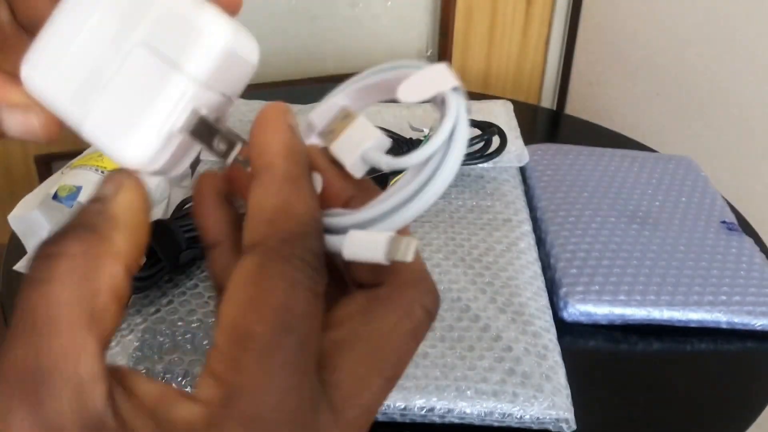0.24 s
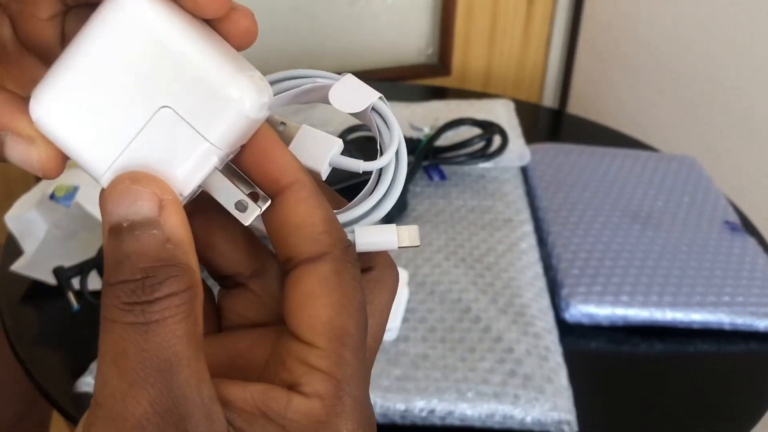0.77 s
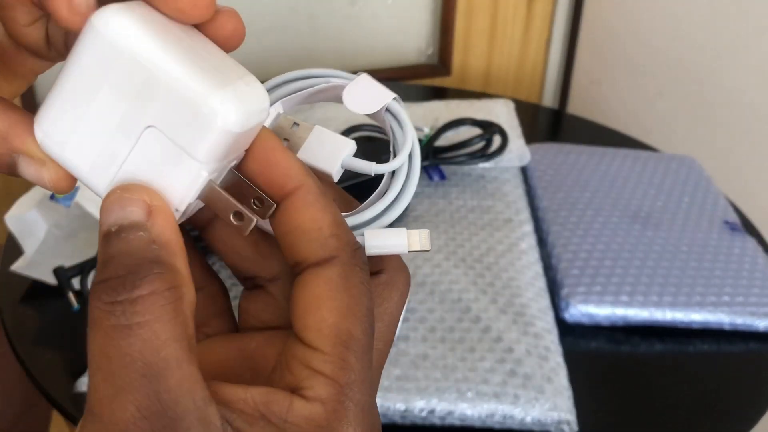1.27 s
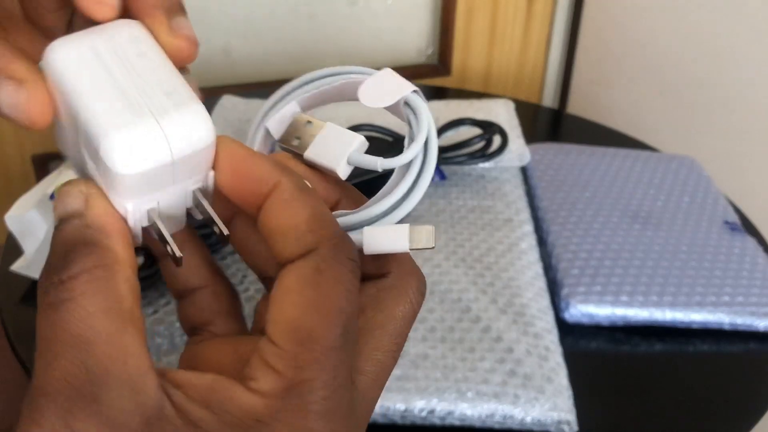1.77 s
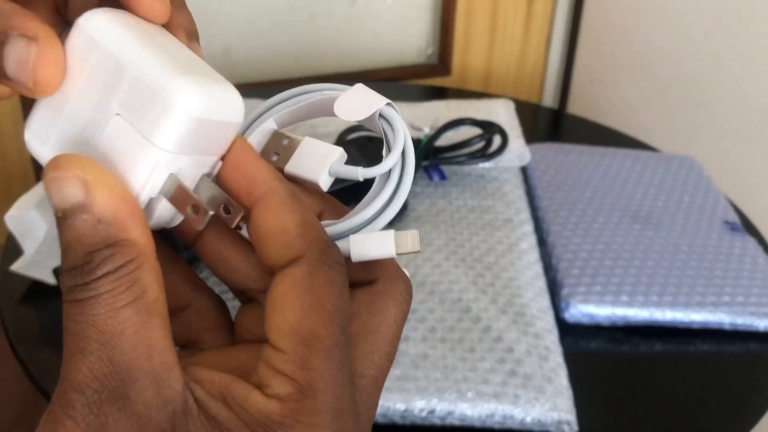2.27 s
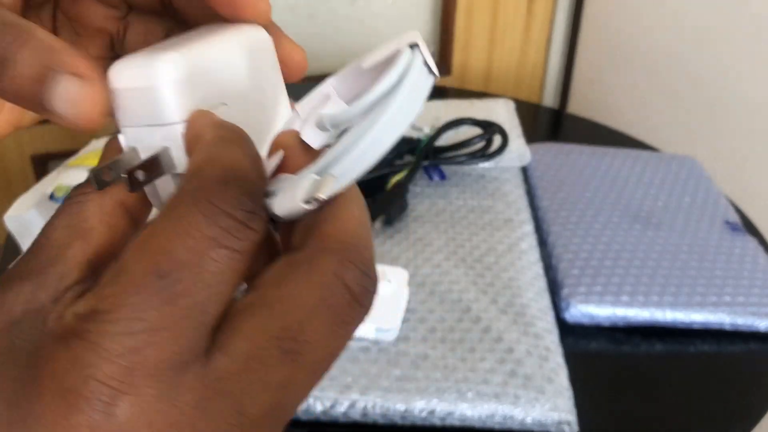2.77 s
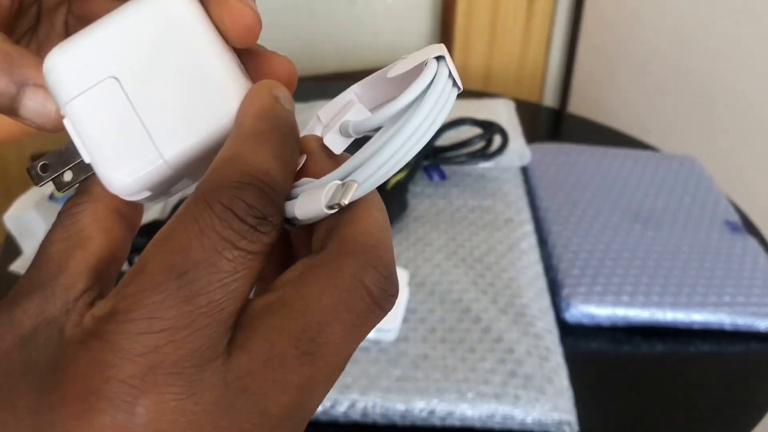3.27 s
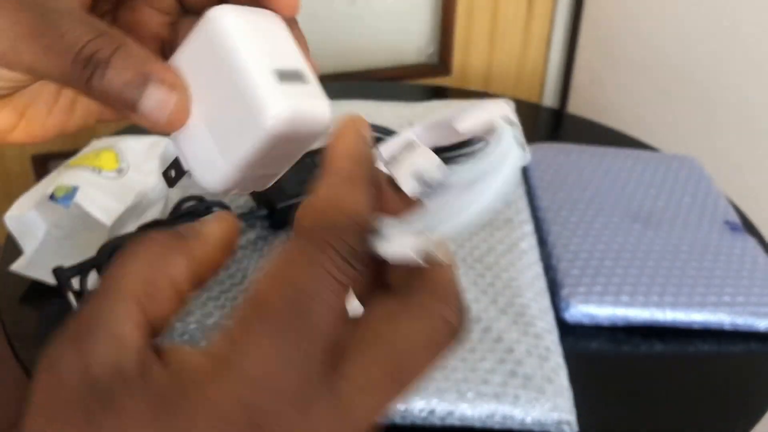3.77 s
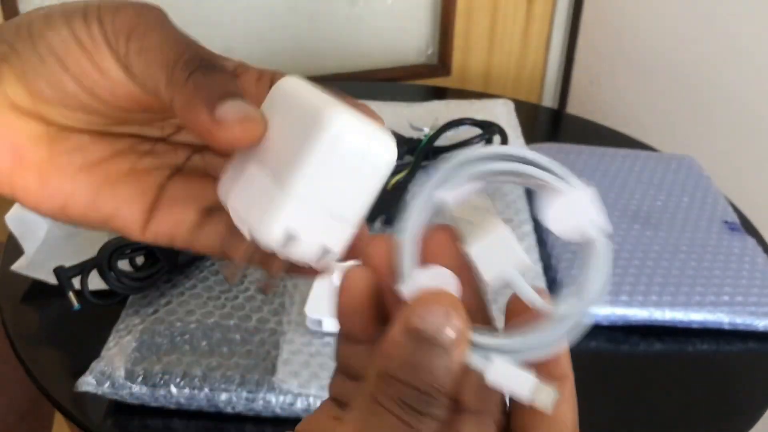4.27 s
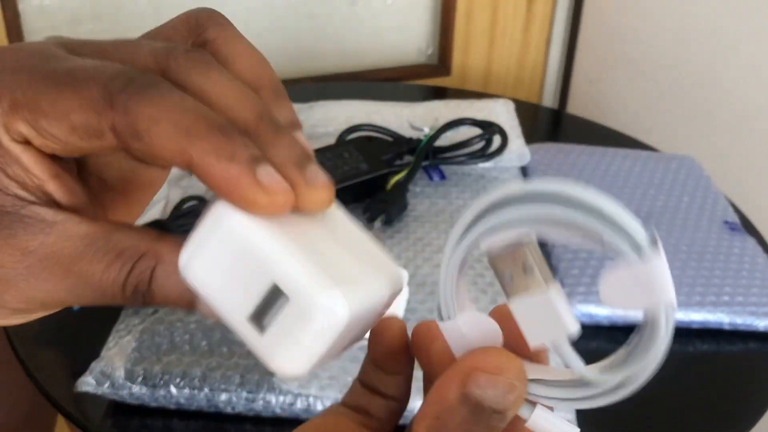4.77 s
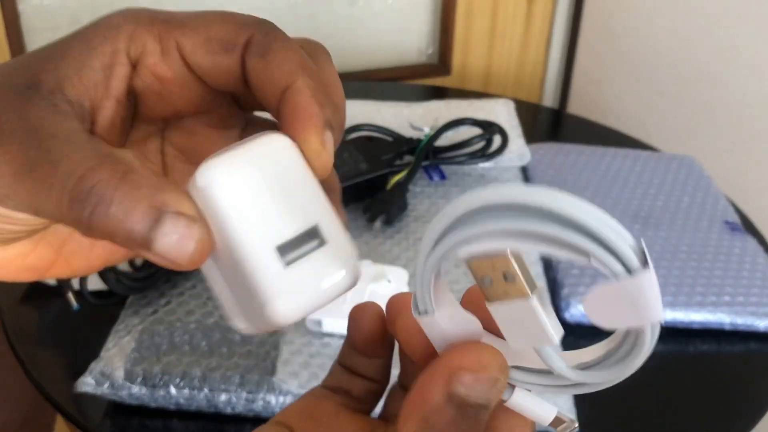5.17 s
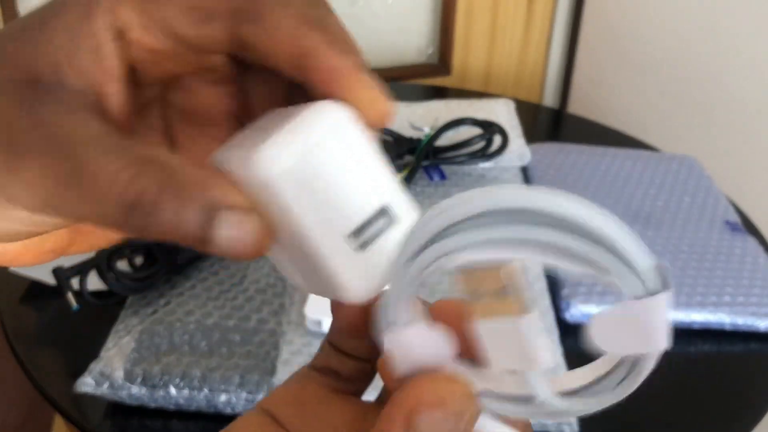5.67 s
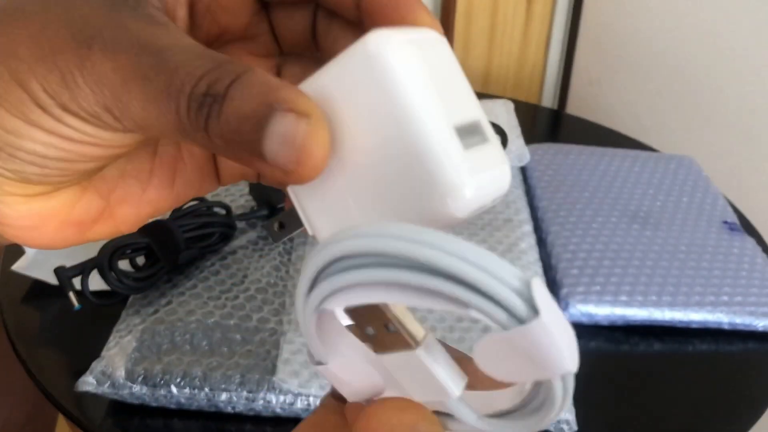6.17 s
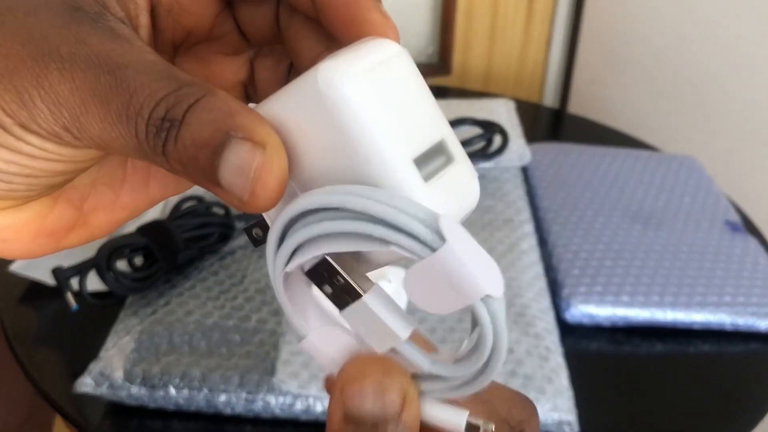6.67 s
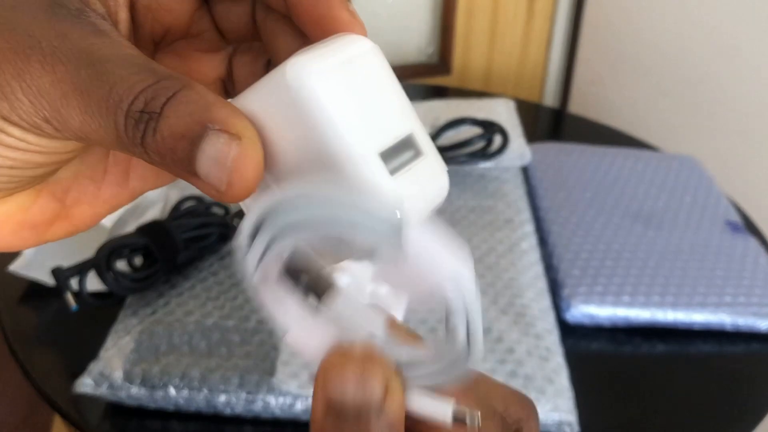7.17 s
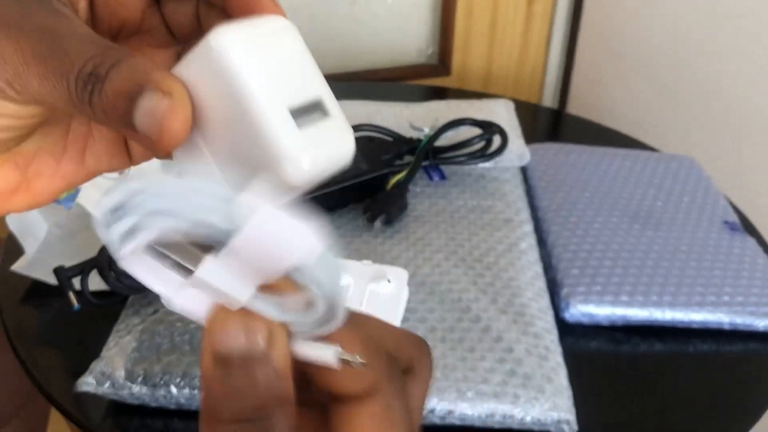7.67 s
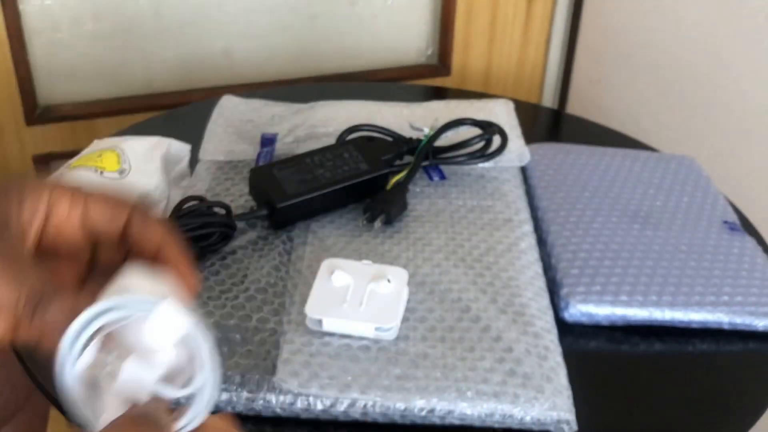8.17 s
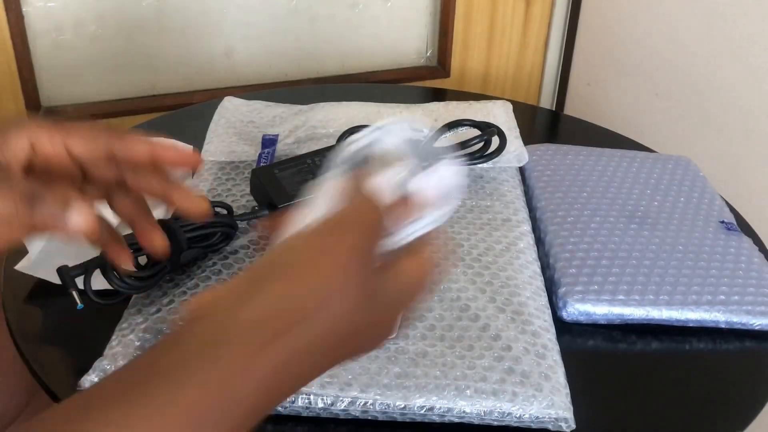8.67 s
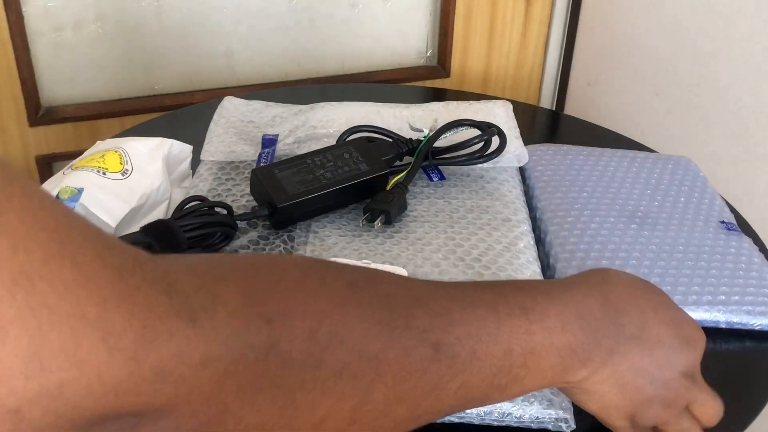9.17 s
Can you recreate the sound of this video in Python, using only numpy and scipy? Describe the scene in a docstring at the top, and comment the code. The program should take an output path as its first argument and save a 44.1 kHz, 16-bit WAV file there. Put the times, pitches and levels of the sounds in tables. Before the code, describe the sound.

A quiet indoor room holds a faint low hum, soft airy hiss and barely audible rapid camera ticking throughout. From 0 to 4 s, close fingers brush smooth plastic in tiny dry slips, with sparse faint clicks and soft padded bumps. A clearer small tick comes at 4.1 s, followed by more light rubbing until about 5.9 s. At 6.3 s a cable's plugs begin rapping the plastic shell: short, bright, rough clicks roughly every 0.2 s, some doubled, dipping around 6.8-7.0, strongest from 7.2 to 7.8, then scattering into a weaker rattle until 8.2 s. Low soft bumps and skin brushes follow, with a light click at 8.5 and a fainter one at 8.8. At 9.13 s the charger hits a wooden table with a loud cracking knock and quick bounces, then a weaker clustered knock at 9.27-9.31 s, ringing briefly in the room.

```python
"""Quiet room with a humming appliance: hands turn a plastic charger and a coiled cable close to a phone.
Fingers brush the plastic (dense noise slips of uneven size, swelling with each stroke) and bump it softly.
The shaken cable's plugs click against the charger: short rough contacts ring the shell.
The charger is then put down on a wooden table, whose modes ring with each blow.
The phone's own camera ticks faintly with every frame; hands and table also sound through the room."""
import sys
import numpy as np
from scipy import signal
from scipy.fft import rfft, irfft, next_fast_len
from scipy.io import wavfile
from scipy.ndimage import uniform_filter1d

SR = 44100
rng = np.random.default_rng(int(sys.argv[2]) if len(sys.argv) > 2 else 0)


def master_out(mix):
    """Clip the mix to full scale and print it as 16-bit PCM to the path in sys.argv[1]."""
    frames = np.transpose(np.atleast_2d(mix))
    ceiling = np.clip(frames, -1, 1)
    pcm = np.round(ceiling * 32767).astype(np.int16)
    wavfile.write(sys.argv[1], SR, pcm)


N = 415863

# room-tone spectrum before levelling: (frequency [Hz], relative density [dB])
AIR_SPECTRUM = [(18, -31), (30, -9), (55, -1), (124, -5), (184, -1.5), (287, -4.5), (415, -5), (449, -9),
                (666, -8.5), (844, -11.5), (1460, -23.5), (2400, -28.5), (2800, -31), (3150, -24.5),
                (3700, -26), (7090, -34), (16000, -53.5)]
# room resonances: (frequency [Hz], half-amplitude width [Hz], rms level [dB])
ROOM_RESONANCES = [(154, 15, -75.5), (186, 19, -78), (223.2, 21.6, -67.5), (289, 33, -70.5),
                   (339.6, 30, -71), (418, 28, -84.5), (535, 78, -71.5)]
# steady motor tones: (frequency [Hz], rms level [dB])
MOTOR_TONES = [(66.8, -68.5), (667.3, -69), (789, -75.5)]
# hands shifting all the while: (time [s], level [dB])
HAND_SHIFT = [(0.0, -81), (1.52, -82.5), (2.41, -80), (3.2, -83), (4.36, -76), (5.38, -79.5), (7.14, -83),
              (7.54, -77), (8.45, -67.5), (8.8, -81), (9.11, -69), (9.43, -74.5)]
# single finger strokes: (nominal start [s], length [s], level at the crest [dB], top octave re level [dB])
FINGER_STROKES = [(0.04, 0.026, -74, -12), (0.186, 0.024, -71.5, -5), (0.96, 0.038, -76.5, -1),
                  (1.222, 0.045, -63, -6), (1.358, 0.064, -69, -0.5), (1.654, 0.1, -68.5, -10),
                  (2.09, 0.13, -75.5, -12), (2.42, 0.053, -71, -24), (2.504, 0.046, -72, -10),
                  (2.566, 0.068, -69, -7), (2.657, 0.026, -71, -9), (2.856, 0.2, -70, -3.5),
                  (3.366, 0.16, -71, -.6), (3.673, 0.068, -72, -2), (3.791, 0.023, -72, -14),
                  (3.875, 0.034, -59.5, -5), (4.044, 0.079, -64, -4), (4.254, 0.035, -63, -10),
                  (4.394, 0.05, -60.5, -6), (4.504, 0.012, -68, -12), (4.62, 0.089, -68.5, -7),
                  (4.957, 0.14, -73, -17), (5.247, 0.011, -72, -1), (5.33, 0.036, -76, -4.5),
                  (5.427, 0.07, -74, 2), (5.583, 0.024, -65.5, -6), (5.773, 0.027, -57.5, -6),
                  (8.327, 0.057, -58, -10), (8.512, 0.036, -52.5, -10), (8.686, 0.065, -62.5, -3),
                  (8.78, 0.032, -65.5, -6), (8.837, 0.027, -52, -5)]
# plug clicks: (time [s], ring peak [dB], struck-spot ring [Hz], treble re peak [dB], hollow note re peak [dB])
PLUG_CLICKS = [(0.066, -48, 3600, -15, -6), (1.238, -50, 3100, -4, -10), (2.462, -49, 2760, -20, -8),
               (2.465, -57, 4570, -17, -21), (3.1667, -49.5, 6500, -3, -23),
               (3.8005, -53.5, 5860, -16, -23), (4.0998, -41.5, 3520, -25, -23),
               (4.0999, -36, 5100, -30, -31), (4.151, -48.5, 5210, 2, -23), (4.608, -56, 6030, -3, -23),
               (5.302, -53, 4900, -8, -23), (5.3423, -50, 4850, -5, -23), (6.2736, -22.5, 4380, -7, -36),
               (6.2759, -17, 6860, -14, -29), (6.276, -25, 2800, -20, -18), (6.4734, -19, 4960, -6, -23.5),
               (6.474, -26, 3100, -20, -16), (6.6542, -22, 4320, -15, -20), (6.6590, -28, 6700, -21, -21),
               (6.8274, -43.5, 8300, 3, -23), (6.8507, -29.5, 6800, -20, -27), (6.853, -38, 2980, -22, -20),
               (6.863, -42, 4900, -18, -9), (7.012, -53, 8140, -2.5, -23), (7.0223, -25.5, 6900, -12, -30),
               (7.0276, -25.5, 4400, -19, -15.5), (7.2110, -16, 5080, -6, -23.5),
               (7.3902, -11.5, 5860, -7.5, -28.5), (7.574, -10.5, 5360, -6, -28.5),
               (7.5769, -20, 3240, -4, -25), (7.7531, -28, 5850, -4, -29), (7.759, -27, 4420, -4, -20),
               (7.7788, -11.5, 6700, -7.5, -34), (7.779, -43, 1580, -22, -30), (7.78, -32, 3870, -20, -27),
               (7.785, -20.5, 6450, -7, -36), (8.0088, -23, 4840, -9, -29), (8.0552, -34, 6370, -5, -18),
               (8.0809, -34.5, 2810, 4, -23), (8.092, -39, 6200, -12, -20), (8.1036, -33.5, 4930, -22, -19),
               (8.116, -38, 6680, -13, -23), (8.2084, -22, 4750, -11, -30), (8.209, -36, 1540, -17, -30),
               (8.5385, -38, 6100, -1, -7.5), (8.7816, -46, 7800, -7, -21)]
# charger shell modes, the first two hollow: (frequency [Hz], relative level [dB], t60 [s])
SHELL_MODES = [(1350, 1, 0.0083), (1890, -6.5, 0.0041), (3160, -20, 0.015), (4250, -17, 0.0037),
               (6030, 4, 0.0013), (7200, -21, 0.001), (8160, -14, 0.0033)]
# soft muffled bumps: (centre [s], pitch [Hz], swell half-length [s], noise rms at the centre [dB])
SOFT_BUMPS = [(0.069, 2480, 0.0059, -55), (0.088, 2750, 0.009, -65), (0.104, 2000, 0.01, -60.5),
              (0.407, 1980, 0.017, -74), (0.985, 3600, 0.04, -70), (1.239, 1090, 0.017, -60.5),
              (4.438, 2300, 0.017, -68), (4.69, 2300, 0.024, -72.5), (2.917, 4430, 0.01, -62.5),
              (5.905, 1920, 0.0062, -60), (2.044, 320, 0.039, -60), (3.6, 320, 0.036, -59.5),
              (3.92, 1140, .008, -63), (8.182, 318, 0.005, -49), (8.205, 346, 0.0092, -48.5),
              (8.233, 314, 0.0078, -53), (8.828, 730, 0.012, -54), (8.834, 870, 0.019, -53),
              (8.874, 307, 0.033, -52)]
# charger landing and bouncing: (time [s], peak [dB], crack re tap [dB], thud re tap [dB])
TABLE_KNOCKS = [(9.127, -10, 3, 0), (9.131, -19.5, 3, 5), (9.143, -21, 1, 3), (9.149, -21.5, 6, 0),
                (9.161, -20, -2, 11), (9.270, -24.5, 4, 4), (9.287, -18, 7, 1), (9.292, -20.5, 4, 14),
                (9.309, -24.5, -5, 6)]
# table-top modes: (frequency [Hz], relative level [dB], t60 [s])
TABLE_MODES = [(128, -14, 0.062), (156, -10, 0.062), (324, -20, 0.03), (387, -23, 0.046), (623, 3, 0.054),
               (694, 2.5, 0.042), (738, 0.5, 0.04), (810, -4.5, 0.047), (877, -3, 0.057),
               (1004, -2.5, 0.032), (1070, -7.5, 0.035), (1220, -8.5, 0.017), (1350, -8, 0.039),
               (1490, -7, 0.035), (1624, -3, 0.029), (1780, -3.5, 0.016), (1950, -0.5, 0.018),
               (2140, -9, 0.012)]
# crack bands of a blow: (centre [Hz], width [Hz], relative gain [dB])
CRACK_BANDS = [(3050, 1000, 3.5), (4050, 1200, 0), (7540, 4300, -24), (11500, 5200, -36)]
# room decay: (frequency [Hz], t60 [s])
ROOM_DECAY = [(125, 0.25), (300, 0.47), (1000, 0.41), (4000, 0.28), (12000, 0.19)]

AIR_RMS_DB, HISS_TOP_HZ, PHONE_TOP_HZ = -60, 15850, 16500
FRAME_HZ, FRAME_START_S, SECOND_TICK_S = 30.005, 0.0037, 0.0121
CLICK_FADE_MS, KNOCK_FADE_MS = 0.79, 2.66  # time constants of the push before its spectrum is evened
ROUGHNESS = 0.37  # 0-1, how uneven the spectrum of a contact is
SPOT_RING_DB, SPOT_T60_S, SPOT_FAR_DB = 1.5, 0.0042, -12  # the spot rings weaker away from the phone
GRIP_HZ, GRIP_DB = 630, -22  # dull note of the holding hand, re click peak
SHELL_SCATTER_DB = 8  # each contact favours other modes
ROOM_PATHS = 4  # successive clicks take these paths in turn
ECHO_S, ECHO_DB = 0.0018, -12  # bounce off the table top
THUD_LAG_S = 0.00136  # slow bending waves arrive after the tap
ROOM_DB, ROOM_FADE_IN_S, TABLE_SEND_DB = -13.5, 0.00051, 7.5


def undb(db):
    """Amplitude factor of a level in dB."""
    return 10 ** (np.asarray(db) / 20)


def level(x, db):
    """Scale x to an rms level in dB."""
    return x * undb(db) / np.sqrt(np.mean(x ** 2))


def peak1(x):
    """Scale x to a peak of 1."""
    return x / np.abs(x).max()


def band(x, lo_hz, hi_hz, order=2):
    """Butterworth band-pass."""
    sos = signal.butter(order, [lo_hz, min(hi_hz, 0.48 * SR)], "band", fs=SR, output="sos")
    return signal.sosfilt(sos, x)


def ring(x, modes):
    """Sum of decaying resonances (frequency [Hz], level [dB], t60 [s]) struck by x."""
    out = 0
    for hz, db, t60_s in modes:
        pole = np.exp(2j * np.pi * hz / SR - np.log(1000) / (t60_s * SR))
        out = out + undb(db) * signal.lfilter([1], [1, -pole], x).imag
    return out


def walk(rate_hz):
    """Random levels held 1 / rate_hz s and slewed twice; spread near 1."""
    hold = int(SR / rate_hz)
    steps = np.repeat(rng.standard_normal(N // hold + 1), hold)
    return 1.3 * uniform_filter1d(uniform_filter1d(steps, hold), hold)[:N]


def add(out, time_s, x, peak_db):
    """Mix x into out at time_s with the given peak."""
    i = int(time_s * SR)
    x = x[:N - i]
    out[i:i + len(x)] += x * undb(peak_db) / np.abs(x).max()


def contact(noise, t, fade_ms):
    """Rough fading push, its spectrum partly evened, cut at 20 ms."""
    push = rfft(noise * np.exp(-t * 1000 / fade_ms))
    evened = push / np.abs(push) ** (1 - ROUGHNESS)
    return irfft(evened, len(t)) * (t < 0.02)


def room_tone(f, n):
    """Shaped noise in half-octave bands that waver a little, together and apart."""
    hz, db = np.transpose(AIR_SPECTRUM)
    shape = undb(np.interp(np.log(f), np.log(hz), db)) * (f < HISS_TOP_HZ)
    spectrum = rfft(rng.standard_normal(n)) * shape
    half_octave = 2 * np.log2(f / 30)
    out, shared = 0, walk(1.71)
    for k in range(19):
        weight = np.clip(1 - abs(half_octave - k), 0, 1)
        out = out + irfft(spectrum * weight, n)[:N] * undb(0.5 * shared + 1.1 * walk(4))
    return level(out, AIR_RMS_DB)


def resonances(f, n):
    """Room resonances: noise narrowed around each one."""
    out = 0
    for hz, width_hz, db in ROOM_RESONANCES:
        spectrum = rfft(rng.standard_normal(n)) / (1 + ((f - hz) / width_hz * 2) ** 2)
        out = out + level(irfft(spectrum, n)[:N], db)
    return out


def motor():
    """Appliance hum: sines sharing one slight speed drift, each wavering in level."""
    out = 0
    warped_time_s = np.cumsum(1 + 0.001347 * walk(2.506)) / SR
    for hz, db in MOTOR_TONES:
        out = out + level(np.sin(2 * np.pi * hz * warped_time_s) * undb(0.97 * walk(3.09)), db)
    return out


def air():
    """Steady background: room tone, room resonances and motor."""
    n = next_fast_len(N)
    f = np.maximum(np.arange(n // 2 + 1) * SR / n, 1)
    return room_tone(f, n) + resonances(f, n) + motor()


def brush():
    """Skin on plastic: dense tiny slips of uneven size, swelling with each stroke."""
    t = np.arange(N) / SR
    shift = undb(np.interp(t, *np.transpose(HAND_SHIFT)))
    low = high = 0
    for start_s, length_s, db, top_db in FINGER_STROKES:
        swell = np.exp(-np.abs((t - start_s) / (0.62 * length_s) - 0.85) ** 2.2)
        low = low + undb(db) * swell
        high = high + undb(db + top_db) * swell
    slips = rng.standard_normal((2, N)) * undb(1.36 * walk(260) + 2.1 * walk(50))
    rub = low * level(band(slips[0], 3300, 9150, order=3), 0)
    sheen = high * level(band(slips[0], 9960, HISS_TOP_HZ, order=6), 0)
    shell = undb(-19.5) * low * level(ring(slips[0], SHELL_MODES[:2]), 0)
    shifting = shift * level(band(slips[1], 5000, HISS_TOP_HZ, order=3), 0)
    return rub + sheen + shell + shifting


def camera():
    """Two short ticks a frame, the second weaker on average, conducted through the phone's body."""
    out = np.zeros(N)
    frame_s = FRAME_START_S + np.arange(int(N / SR * FRAME_HZ)) / FRAME_HZ
    size = rng.standard_normal((len(frame_s), 2))
    out[(frame_s * SR).astype(int)] = undb(0.8 * size[:, 0])
    out[((frame_s + SECOND_TICK_S) * SR).astype(int)] = undb(-5 + 1.5 * size[:, 1])
    body_modes = [(362, -24, 0.019), (860, 2, 0.0032), (1300, 20, 0.0012), (2150, -3, 0.001)]
    return level(band(ring(out, body_modes), 200, 2740, order=4), -75)


def clicks():
    """Short rough contacts ring the shell and the struck spot; row 0 is near, the others feed the room."""
    out, t = np.zeros((1 + ROOM_PATHS, N)), np.arange(2048) / SR
    grit = rng.standard_normal((len(PLUG_CLICKS), len(t)))
    for k, (click, noise) in enumerate(zip(PLUG_CLICKS, grit)):
        time_s, peak_db, spot_hz, treble_db, hollow_db = click
        push = contact(noise, t, CLICK_FADE_MS)
        shell = [(hz, db + SHELL_SCATTER_DB * r, t60_s)
                 for (hz, db, t60_s), r in zip(SHELL_MODES, noise[::-1])]
        treble = band(push, 9000, 16500, order=3)
        hollow = band(ring(push, shell[:2]), 1000, 2600)
        grip = band(push, GRIP_HZ * 0.48, GRIP_HZ * 2.5)
        near, far = out[0], out[1 + k % ROOM_PATHS]
        for heard, spot_db in ((near, SPOT_RING_DB), (far, SPOT_RING_DB + SPOT_FAR_DB)):
            rings = ring(push, [(spot_hz, spot_db, SPOT_T60_S)] + shell[2:])
            add(heard, time_s, band(rings, min(2800, spot_hz * 0.81), 8700), peak_db)
            add(heard, time_s, treble, peak_db + treble_db)
            add(heard, time_s, hollow, peak_db + hollow_db)
            add(heard, time_s, grip, peak_db + GRIP_DB)
    return out + undb(ECHO_DB) * np.roll(out, int(ECHO_S * SR), axis=1)


def bumps():
    """Padded contacts: narrow-band noise that swells and fades."""
    out, t = np.zeros(N), np.arange(N) / SR
    for centre_s, hz, length_s, db in SOFT_BUMPS:
        thud = band(rng.standard_normal(N), hz * 0.915, hz * 1.065, order=1)
        out += level(thud, db) * np.exp(-((t - centre_s) / length_s) ** 2)
    return out


def knocks():
    """A blow rings the table top: a bright crack and a tap first, the thud a moment later."""
    out, t = np.zeros(N), np.arange(12000) / SR
    grit = rng.standard_normal((len(TABLE_KNOCKS), len(t)))
    for (time_s, peak_db, crack_db, thud_db), noise in zip(TABLE_KNOCKS, grit):
        push = contact(noise, t, KNOCK_FADE_MS)
        tap = thud = 0
        for k, (hz, db, t60_s) in enumerate(TABLE_MODES):
            # each blow detunes and favours other modes
            mode = (hz * (1 + 0.0062 * noise[-31 - k]), db + 2.1 * noise[-1 - k], t60_s)
            # neighbouring modes swing opposite ways at the struck spot
            swing = (-1) ** k * ring(push, [mode])
            if hz < 1200:
                thud = thud + swing
            else:
                tap = tap + swing
        thud = np.roll(band(thud, 115, 3000), int(THUD_LAG_S * SR))
        crack = sum(undb(db) * band(push, hz - width_hz / 2, hz + width_hz / 2, order=1)
                    for hz, width_hz, db in CRACK_BANDS)
        blow = peak1(tap) + undb(thud_db) * peak1(thud) + undb(crack_db) * peak1(crack)
        add(out, time_s, blow, peak_db)
    return out


def room(x):
    """Diffuse tail: decaying noise, each octave band with its own t60, the treble dying first."""
    t = np.arange(SR // 2) / SR
    hz, t60_s = np.transpose(ROOM_DECAY)
    tail = 0
    for centre_hz in 125 * 2.0 ** np.arange(8):
        fall = np.exp(-np.log(1000) * t / np.interp(np.log(centre_hz), np.log(hz), t60_s))
        noise = rng.standard_normal(len(t))
        tail = tail + fall * band(noise, centre_hz / 2 ** 0.5, centre_hz * 2 ** 0.5)
    tail = tail * np.clip(t / ROOM_FADE_IN_S, 0, 1) ** 2
    return undb(ROOM_DB) * signal.fftconvolve(x, tail / np.sqrt(np.sum(tail ** 2)))[:N]


def scene():
    """Sum of near sounds, their room tails and the background."""
    skin = brush()
    near_clicks, *far_clicks = clicks()
    table = knocks()
    direct = near_clicks + table + skin + bumps()
    # the table is further from the phone than the hands, so it sounds wetter
    tails = sum(map(room, far_clicks)) + room(skin + undb(TABLE_SEND_DB) * table)
    return (direct + tails + air() + camera())[None]


def record(dry):
    """The phone drops the deepest bass and cuts the very top."""
    x = signal.sosfilt(signal.butter(2, 45, "high", fs=SR, output="sos"), dry)
    return signal.sosfilt(signal.ellip(8, 0.2, 70, PHONE_TOP_HZ, fs=SR, output="sos"), x)


dry = scene()
out = record(dry)
master_out(out)
```